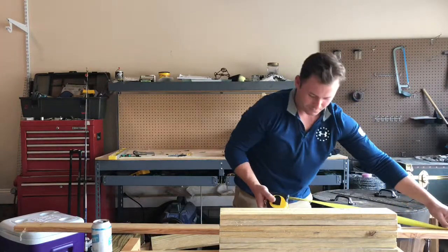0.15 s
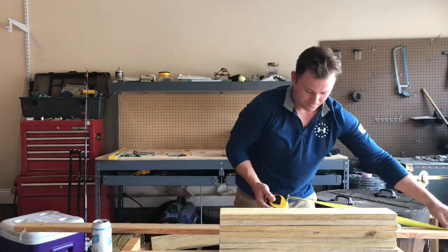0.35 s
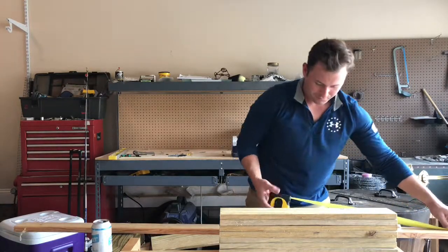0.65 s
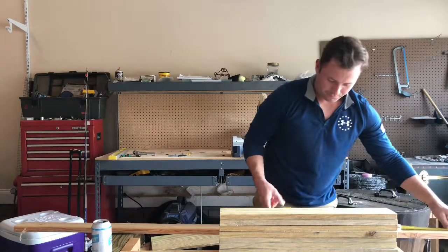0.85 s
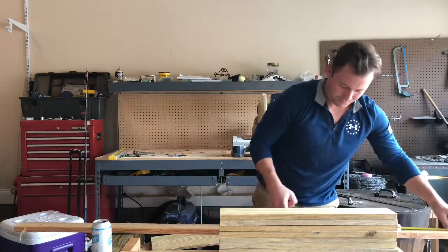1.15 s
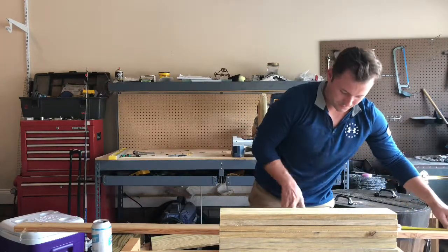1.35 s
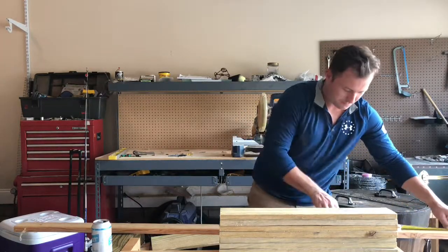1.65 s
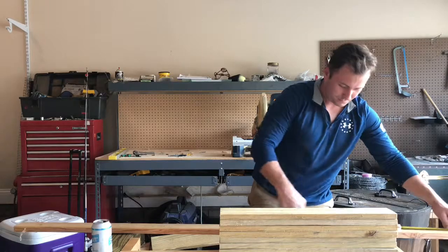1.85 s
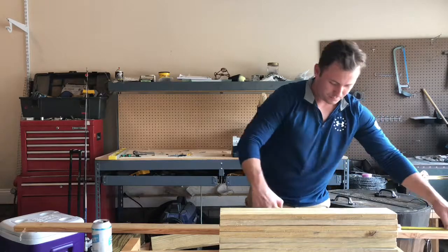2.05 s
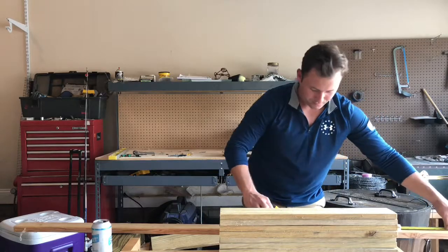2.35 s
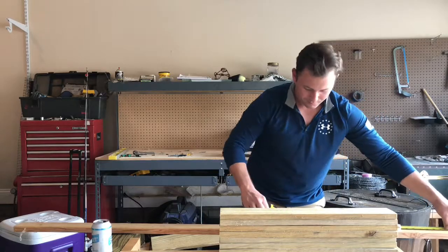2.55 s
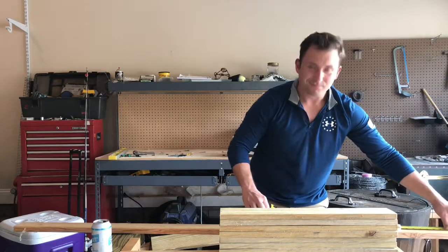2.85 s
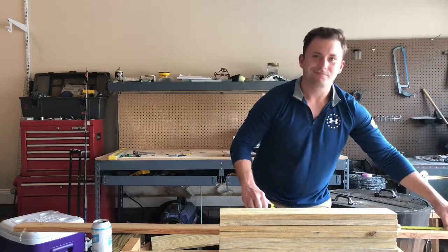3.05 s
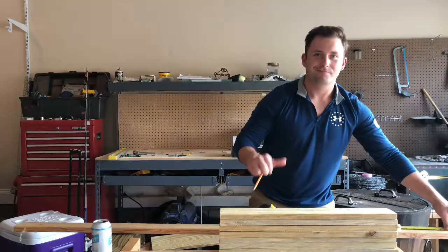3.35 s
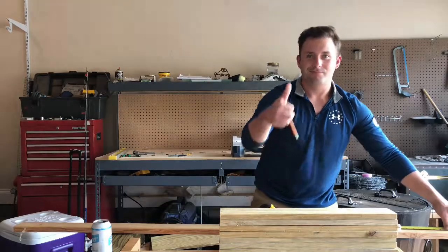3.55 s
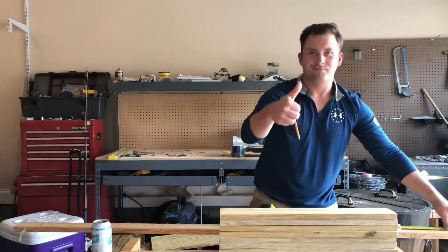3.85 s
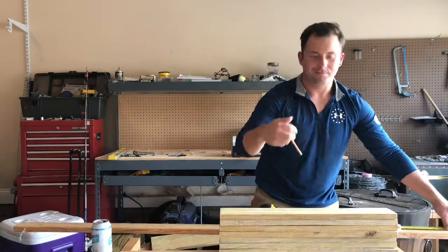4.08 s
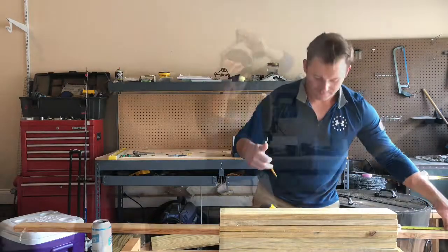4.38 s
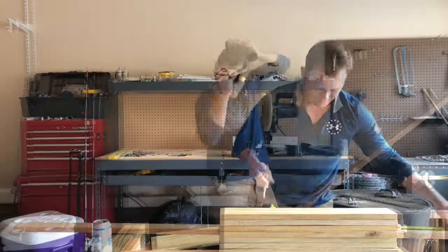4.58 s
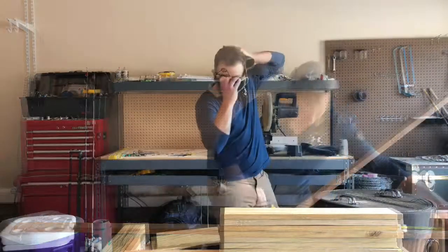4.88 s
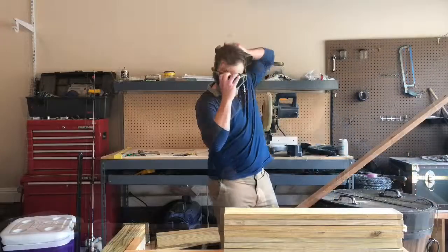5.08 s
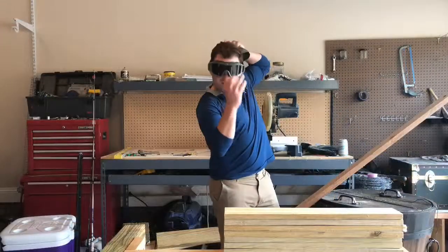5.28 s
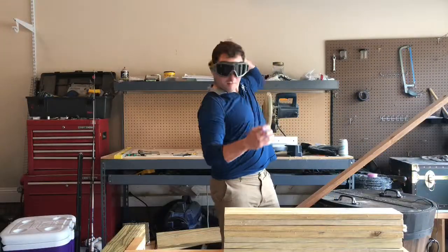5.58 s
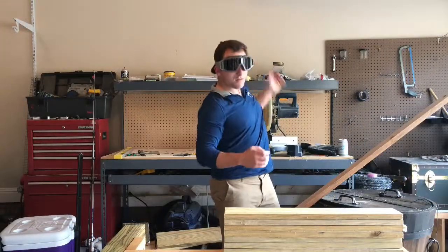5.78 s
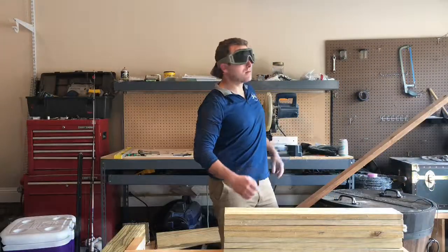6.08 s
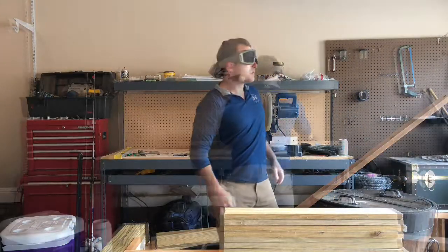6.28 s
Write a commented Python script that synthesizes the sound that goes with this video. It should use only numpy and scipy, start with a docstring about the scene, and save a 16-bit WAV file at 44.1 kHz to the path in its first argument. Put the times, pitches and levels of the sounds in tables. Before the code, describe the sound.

Faint ticks, a sharp metallic crack and rattling knocks on lumber, then quiet cricket chirps, small rustles and one late plastic slap in a concrete garage.

```python
"""Light knocks and ticks over a rustle of sleeves, then a hard slap: a workshop in a concrete garage.
A steel tape measure snaps, rattles and knocks on boards, a pencil ticks, goggles slap down late on.
Contacts are short noisy pushes ringing resonances, heavy blows add decaying sines, cloth is grainy noise.
A cricket of pulsed sine chirps fades out after 4.3 s, over a low rumble and room tone of coloured noise;
decaying noise tails give the room's answer to every contact and rustle."""
import sys
import numpy as np
from scipy import signal
from scipy.fft import rfft, irfft, next_fast_len
from scipy.io import wavfile
from scipy.ndimage import uniform_filter1d, map_coordinates

SR = 44100
rng = np.random.default_rng(int(sys.argv[2]) if len(sys.argv) > 2 else 0)


def persist_wave(psi):
    """Save psi, clipped to +-1, as 16-bit WAV."""
    counts = np.round(np.clip(psi, -1, 1) * 32767).astype(np.int16)
    wavfile.write(sys.argv[1], SR, np.atleast_2d(counts).T)


N = 283122  # length [samples]


def amp(db):
    """Turn a level in dB into a gain."""
    return 10 ** (np.asarray(db) / 20)


def unit(x):
    """Scale to rms 1."""
    return x / np.sqrt(np.mean(x ** 2) + 1e-20)


def along(points, hz):
    """Read a curve of (frequency [Hz], value) points on a log frequency axis."""
    f, value = np.transpose(points)
    return np.interp(np.log(hz + 1), np.log(f + 1), value)


def curves(rows):
    """Draw each column after the time as a curve with one value per sample."""
    time, *columns = np.transpose(rows)
    return [np.interp(np.arange(N) / SR, time, column) for column in columns]


def wobble(rate):
    """A smooth random curve with the given number of knots per second."""
    knots = rng.standard_normal(int(N * rate / SR) + 4)
    return map_coordinates(knots, [np.arange(N) * rate / SR])


def filtered(x, response):
    """Filter x by a complex response of frequency, zero-padded at the end."""
    m = next_fast_len(len(x) + 2048)
    return irfft(rfft(x, m) * response(np.fft.rfftfreq(m, 1 / SR)), m)[:len(x)]


def noise(spectrum):
    """Noise of rms 1, coloured by (frequency [Hz], density [dB per Hz]) points."""
    return unit(filtered(rng.standard_normal(N), lambda hz: amp(along(spectrum, hz))))


def resonance(f, hz, width_hz):
    """One causal resonance, gain 1 at its centre: damping sets the width."""
    return 1j * f * width_hz / (hz * hz - f * f + 1j * f * width_hz + 1e-9)


def contacts(table, modes, broad_hz, ring_db, sharp, widen, lead, snap_db, tilt_db):
    """Each contact grazes, snaps and pushes roughly: a broad crack, the spot's own ring, the body's modes.

    lead is the graze's e-fold [s], snap_db the snap against the push, tilt_db the tilt [dB per octave].
    """
    out = np.zeros(N + SR)
    t = np.arange(-400, SR // 7) / SR
    for time, db, spot_hz, spot_db, length in table:
        graze = np.exp(np.minimum(t, 0) / lead)
        decay = amp(-60 * t / np.clip(length, .002, .2))
        push = rng.standard_normal(len(t)) * np.where(t < 0, graze, decay)
        push[t == 0] += amp(snap_db) * np.linalg.norm(push)  # the full touch is one clean impulse
        # even out the push's spectrum, so no band of the noise sticks out
        spread = rfft(push)
        push = irfft(spread / uniform_filter1d(np.abs(spread), size=60), len(t))
        strengths = amp(ring_db + rng.normal(0, 3, len(modes)))  # every contact rings the modes differently
        spot_width = spot_hz / (sharp * amp(0.36 * spot_db))  # a stronger spot resonance is narrower

        def body(f):
            """Crack, spot and modes in parallel, the modes in alternating polarity."""
            ring = sum((-1) ** k * strengths[k] * amp(mode_db) * resonance(f, mode_hz, width * widen)
                       for k, (mode_hz, width, mode_db) in enumerate(modes))
            crack = resonance(f, broad_hz, 2.5 * broad_hz) ** 2
            spot = amp(spot_db) * resonance(f, spot_hz, spot_width) ** 2
            tilt = amp(tilt_db * np.log2((f + 50) / broad_hz))
            return (ring + crack + spot) * tilt

        hit = filtered(push, body)
        loudest = np.sqrt(uniform_filter1d(hit ** 2, size=180).max())  # highest rms over 180 samples
        out[round((time + t[0]) * SR):][:len(t)] += amp(db) * hit / loudest
    return out[:N]


# Wood and plastic knocks: (time [s], highest short-term level before the mix [dB],
# spot resonance [Hz], its strength before tilt [dB], contact length to -60 dB, held to 0.002-0.2 [s])
WOOD_KNOCKS = [(0.05, -51, 413, -12, 0.031), (0.1755, -44, 810, -21, 0.014), (0.2805, -42, 1610, 4, .03),
               (0.41, -49, 3120, -6, 0.032), (0.431, -46, 3040, -2, .09), (0.49, -44, 420, 15, 0.092),
               (0.522, -43, 480, -3, .02), (0.81, -50.5, 3130, -9, 0.019), (0.9345, -10, 1890, 8, 0.096),
               (0.9365, -16, 558, 12.5, 0.1), (0.945, -21.5, 340, 13, 0.1), (0.99, -16.5, 700, -19, 0.058),
               (1.02, -22.5, 350, 0, 0.078), (1.068, -28, 600, 8, .023), (1.1105, -28, 2230, -1, 0.11),
               (1.592, -29, 528, 18.5, 0.045), (1.598, -32, 2900, 13, .02), (1.615, -27.5, 695, 5, .022),
               (1.616, -30.5, 2930, 21, .016), (1.651, -32, 2920, 17, 0.027), (1.67, -41, 2930, 5, .035),
               (1.692, -31.5, 3000, 2, 0.028), (1.73, -33, 2830, 23, .013), (1.854, -45, 2400, 9, 0.052),
               (1.8875, -27, 410, 19, 0.039), (1.905, -27.5, 1950, 11, 0.053),
               (1.9705, -20, 480, 5.5, 0.078), (1.976, -28.5, 336, 15, 0.068),
               (1.99, -21.5, 1850, 2, 0.037), (2.008, -20, 615, 3, 0.069), (2.03, -22.5, 673, -3, 0.04),
               (2.285, -41, 390, 9, 0.092), (2.442, -45, 1920, 0, 0.069), (2.5425, -30, 1020, 14, 0.032),
               (2.549, -27, 527, 12.5, 0.028), (2.73, -48.5, 410, -4, .032), (3.038, -51.5, 1900, 13, .025),
               (3.0385, -62, 3135, 14, .02), (4.43, -60.5, 2000, 10, .037), (4.574, -45.5, 1330, -9, 0.027),
               (5.205, -48, 1500, 12, .03), (5.235, -48.5, 2050, 9.5, .025), (5.552, -38.5, 700, -3, 0.05),
               (5.561, -30, 1042, 10.5, 0.023), (5.565, -27.5, 400, 11.5, 0.028),
               (5.568, -13.5, 982, 1.5, .006), (5.578, -28.5, 1070, 7, 0.022)]
# Modes of the boards: (frequency [Hz], width before widening [Hz], relative level before tilt [dB])
BOARD_MODES = [(350, 18, 5.5), (512, 100, 4.5), (747, 32, 7), (1510, 32, -19.5), (1920, 80, -6.5),
               (2125, 15, 2), (2860, 29, -8.5), (3130, 5.7, -5.5)]


def wood_knocks():
    """Knocks ring the boards in broad, heavily damped modes."""
    return contacts(WOOD_KNOCKS, BOARD_MODES, broad_hz=940, ring_db=-6.5, sharp=2.0, widen=3,
                    lead=.0011, snap_db=-3.0, tilt_db=-2.4)


# Steel and hard ticks: (time [s], highest short-term level before the mix [dB],
# spot resonance [Hz], its strength before tilt [dB])
STEEL_TICKS = [(0.0508, -42.5, 8900, -15), (0.179, -44.5, 4100, -11), (0.186, -47, 9400, 1),
               (0.2105, -44, 4600, 1), (0.249, -51, 4880, 0), (0.284, -46, 3700, 18),
               (0.325, -58.5, 3820, -3), (0.404, -53, 4050, -18), (0.4108, -39.5, 5640, -9),
               (0.432, -39, 4500, -26), (0.815, -39.5, 5540, 16), (0.8239, -30.5, 11100, 0),
               (0.9355, -7, 6130, -6), (0.943, -17.5, 6130, -23), (1.0677, -21, 11500, -1),
               (1.076, -32, 11100, 3), (1.1125, -32.5, 5740, 14), (1.153, -38, 3540, -10),
               (1.164, -32, 6600, 1), (1.175, -38.5, 9300, 1), (1.2045, -33, 5700, 4),
               (1.296, -50, 6000, 5.5), (1.316, -40.5, 5700, -2), (1.385, -44.5, 3650, -6),
               (1.4418, -40, 4100, -18), (1.582, -45, 6900, 6), (1.599, -38.5, 5400, 2),
               (1.615, -36, 7160, -3), (1.6513, -42, 3000, 3), (1.67, -44, 3210, 1), (1.692, -29, 3990, -9),
               (1.7094, -27, 6800, 10), (1.721, -28, 3860, -13), (1.854, -38, 7000, -12),
               (1.89, -29.5, 3970, 6), (1.905, -19, 4550, 4), (1.91, -15.5, 6100, 1),
               (1.9735, -22.5, 5030, -10), (2.007, -27, 3530, -8), (2.015, -25, 2480, -13),
               (2.111, -48, 10900, 0), (2.198, -51.5, 4900, 13), (2.2862, -39.5, 5900, 1),
               (2.37, -48.5, 5770, -1), (2.4, -59, 5590, 14), (2.438, -34.5, 9600, 22),
               (2.444, -48, 3850, 0), (2.463, -41.5, 7300, 4), (2.478, -41, 9700, 27),
               (2.504, -49, 9800, 10), (2.544, -38.5, 3920, 10), (2.5722, -40.5, 4700, 6),
               (2.581, -41.5, 3400, 9), (2.73, -55.5, 4190, 6.5), (2.86, -64.5, 10000, 4),
               (3.0052, -54.5, 8740, 10), (4.579, -49.5, 11100, 8.5), (5.238, -57, 9000, 2.5),
               (5.551, -49, 4840, 4.5), (5.568, -38.5, 5220, -6), (5.7, -52.5, 4480, 0.5),
               (5.8, -61, 3740, 2.5), (6.3138, -60, 9540, 5.5)]
# Modes of the tape blade: (frequency [Hz], width [Hz], relative level before tilt [dB])
BLADE_MODES = [(3660, 39, 1), (3564, 50, 3.5), (3955, 52, 7.5), (5500, 9, 12), (5900, 37, 5),
               (6130, 44, 12), (9550, 54, -7.5), (11200, 47, -18)]
TICK_S = 0.017  # contact length of every tick, to -60 dB [s]


def steel_ticks():
    """Short hard touches ring the thin blade in narrow, high modes."""
    ticks = [(*row, TICK_S) for row in STEEL_TICKS]
    return contacts(ticks, BLADE_MODES, broad_hz=5700, ring_db=-11.5, sharp=3, widen=1.0,
                    lead=.0008, snap_db=-1.5, tilt_db=-2.5)


# Heavy blows on the bench: (time [s], gain on the swing [dB])
THUMP_BLOWS = [(0.937, -29), (0.974, -31), (1.019, -42), (1.067, -37.5), (1.1, -42), (1.615, -43.5),
               (1.888, -33), (1.974, -28), (2.016, -40), (2.546, -43.5), (5.562, -37.5)]
# Low modes of the bench: (frequency [Hz], relative level [dB], t60 [s])
BENCH_MODES = [(62.3, -2, .12), (93.5, -2, .09), (134, 5.5, .07), (153, 4, 0.097)]


def bench_thumps():
    """The bench gives a low, quickly damped swing under the heavy blows."""
    out = np.zeros(N + SR)
    t = np.arange(SR // 3) / SR
    ring = sum(amp(db - 60 * t / t60) * np.sin(2 * np.pi * hz * t) for hz, db, t60 in BENCH_MODES)
    swing = (1 - np.exp(-t / .003)) * ring
    for time, db in THUMP_BLOWS:
        out[round(time * SR):][:len(t)] += amp(db) * swing
    return out[:N]


# Strokes of cloth and sliding friction: (time at full level [s], level [dB], rise [s per 20 dB],
# hold [s], fall [s per 20 dB], treble against body [dB]); rise and fall act as at least 0.003 s
RUSTLE_STROKES = [(0.095, -56.5, 0.5, .005, 0.56, -5), (0.468, -52, 0.12, 0.0088, 0.24, -4.5),
                  (0.796, -59, .19, .005, -0.5, 4), (0.91, -59, 0.21, .005, 0.4, 9.5),
                  (1.24, -42.5, -0.18, .005, .4, -26), (1.432, -50.5, 0.25, .1, 1.04, -10.5),
                  (1.734, -46.5, 0.15, 0.0056, 0.07, -6), (1.868, -39, 0.03, 0.038, -0.04, -4),
                  (1.921, -31.5, -0.08, 0.005, 0.0036, 4), (2.105, -40.5, 0.47, 0.0044, 0.125, -30),
                  (2.272, -55, 0.2, .005, 0.4, -17), (2.421, -55.5, 0, .005, -0.1, -9),
                  (2.6, -48, 0.13, .005, 0.03, -26), (2.731, -58, 0, .005, -0.05, -6),
                  (3.409, -61, 0.03, 0.088, 0.16, -0.5), (3.98, -74.5, 0.54, .01, 0.3, 4),
                  (4.084, -72, -0.13, .005, 0.3, 3), (4.44, -59.5, 0.06, 0.16, 0, -0.5),
                  (4.578, -47.5, -0.01, 0.041, .13, -3.5), (4.8, -69.5, 0.5, 0.087, 0.7, 2),
                  (5.078, -60.5, 0.1, 0.029, 0.16, 0), (5.231, -56, 0.04, 0.021, 0.03, -4.5),
                  (5.289, -65.5, 0.5, 0.054, 0.2, -5.5), (5.54, -60, 0.03, .005, 0.05, 0.5),
                  (5.631, -51, 0.21, .005, 0.19, -12), (5.95, -74, 1.8, 0.11, .04, 7),
                  (6.121, -69, .03, 0.0046, .1, 3), (6.405, -74, .15, .005, -1, 1)]
# Colour of the cloth: (frequency [Hz], relative density [dB per Hz])
CLOTH_COLOUR = [(290, -44.5), (500, 4.5), (569, -3.5), (1060, -3.5), (1240, -1), (1970, -3.5), (11600, -9),
                (15700, -19)]


def rustle():
    """Fibres catch and slip: grainy noise in strokes that swell and fade, each with its own brightness."""
    t = np.arange(N) / SR
    body_power, treble_power = np.zeros(N), np.zeros(N)
    for time, db, rise, hold, fall, treble_db in RUSTLE_STROKES:
        before = (time - t) / max(rise, .003)
        after = (t - time - hold) / max(fall, .003)
        power = amp(db - 20 * np.maximum(0, np.maximum(before, after))) ** 2
        body_power += power
        treble_power += power * amp(treble_db) ** 2
    grain = amp(0.83 * wobble(280) + 1.5 * wobble(40))
    cloth = unit(noise(CLOTH_COLOUR) * grain)
    treble = filtered(cloth, lambda f: f ** 2 / (f ** 2 + 6000 ** 2))
    return np.sqrt(body_power) * (cloth - treble) + np.sqrt(treble_power) * treble


# Decay of the concrete room: (frequency [Hz], t60 [s])
ROOM_DECAY = [(100, .7), (400, 0.54), (1500, 0.48), (5000, 0.4), (12000, 0.2)]


def garage(x):
    """Near benches and walls answer densely at once, then each frequency dies at its own speed."""
    out = np.zeros(N + 2 * SR)
    step = SR // 10
    for start in range(0, N, step):  # a new tail every tenth of a second: the sources move
        hz, t, grid = signal.stft(rng.standard_normal(SR * 2 // 3), SR, nperseg=256)
        late = amp(-60 * t / along(ROOM_DECAY, hz)[:, None])
        early = amp(2 - 60 * t / 0.037)
        tail = signal.istft(grid * (late + early), SR, nperseg=256)[1][:SR]
        wet = signal.fftconvolve(x[start:start + step], tail / np.linalg.norm(tail))
        out[start + 120:][:len(wet)] += wet  # answers 120 samples late
    return out[:N]


# Insect level over time: (time [s], level before a fixed lift [dB])
INSECT_LEVEL = [(0, -63.5), (2.5, -61), (4.3, -63.5), (4.7, -89)]
# The beat: (start of one chirp [s], period [s], pitch [Hz], t60 [s])
CHIRP_BEAT = (2.8445, .12404, 6950, .04)


def cricket():
    """A short chirp on a steady beat with its echo, and a thin trill of other insects behind it."""
    start, period, hz, t60 = CHIRP_BEAT
    t = np.arange(N) / SR
    since = (t - start) % period
    rise = 1 - np.exp(-(since / 0.00039) ** 2)
    chirp = amp(-60 * since / t60) * np.sin(2 * np.pi * hz * t + .4 * wobble(150))
    echo = amp(-17 - 60 * since / .12) * noise([(6300, -60), (6950, 0), (7600, -60)])
    trill = amp(-25 + 2.5 * wobble(12)) * noise([(6700, -61.5), (7350, -3), (7600, -4), (8600, -60)])
    level = amp(curves(INSECT_LEVEL)[0] + 5.5)
    return level * (rise * (chirp * amp(wobble(6)) + echo) + trill)


# Background over time: (time [s], rumble level before trim [dB], room tone level before trim [dB])
FLOOR_LEVELS = [(0.0, -54, -53.5), (0.95, -50.5, -55), (1.11, -42.5, -62), (1.32, -53, -50),
                (1.63, -51, -55), (2.09, -48, -52), (2.31, -49.5, -54.5), (2.82, -52.5, -54.5),
                (4.29, -51.5, -56), (4.79, -54, -59), (5.09, -48.5, -55.5), (5.65, -47, -55),
                (6.42, -52, -56)]
# Colour of the rumble: (frequency [Hz], relative density [dB per Hz])
RUMBLE_COLOUR = [(7.1, -25), (12, 5.5), (41, 0.5), (87, -8.5), (118, -7.5), (140, -20), (200, -19),
                 (260, -46.5), (440, -120)]
# Colour of the room tone: (frequency [Hz], relative density [dB per Hz])
TONE_COLOUR = [(88, -37.5), (150, -7), (230, 1), (254, -4), (280, -3), (374, -3.5), (563, -13.5),
               (784, -15.5), (916, -14.5), (1920, -27), (5820, -38), (7070, -31.5), (8760, -40),
               (15700, -46)]


def rumble_and_room_tone():
    """Distant traffic rumble in lumps, and the steadier tone of the room, both as coloured noise."""
    rumble_db, tone_db = curves(FLOOR_LEVELS)
    rumble = amp(rumble_db + 3.5 + 1.5 * wobble(7)) * noise(RUMBLE_COLOUR)
    tone = amp(tone_db - 1 + 0.31 * wobble(1.3)) * noise(TONE_COLOUR)
    return rumble + tone


def scene():
    """Knocks, ticks, thumps and cloth in the room, over insects and rumble."""
    wood, steel = wood_knocks(), steel_ticks()
    bench, cloth = bench_thumps(), rustle()
    room = garage(amp(-3.0) * wood + amp(-1.5) * steel + amp(-2.5) * bench + amp(-6.0) * cloth)
    direct = amp(-2.5) * wood + steel + bench + cloth
    return (direct + room + cricket() + rumble_and_room_tone())[None]


TOP_HZ = 15750  # nothing passes above this


def record(dry):
    """Peaks bend softly below full scale, the top droops, the microphone hisses, the band ends steeply."""
    clipped = dry[0] / (1 + np.abs(dry[0]) ** 8) ** (1 / 8)
    drooped = filtered(clipped, lambda hz: amp(-3 * (hz / TOP_HZ) ** 6))
    hiss = amp(-80.5) * noise([(3000, -25.5), (9000, -1.5), (16000, -2.5)])
    return filtered(drooped + hiss, lambda hz: np.clip((TOP_HZ - hz) / 150, 0, 1))[None]


dry = scene()
out = record(dry)
persist_wave(out)
```